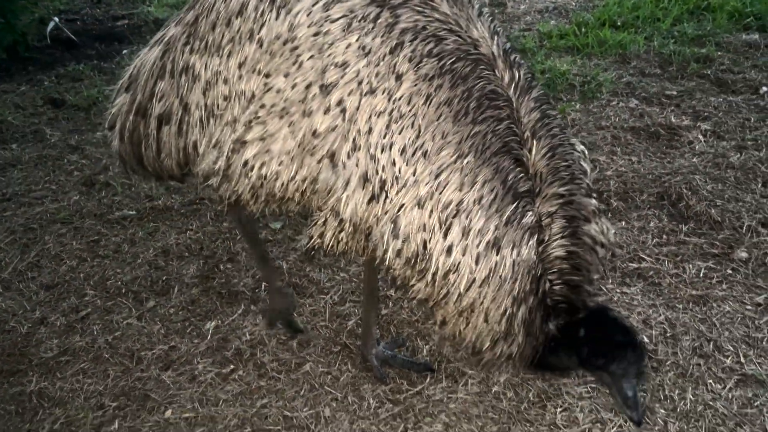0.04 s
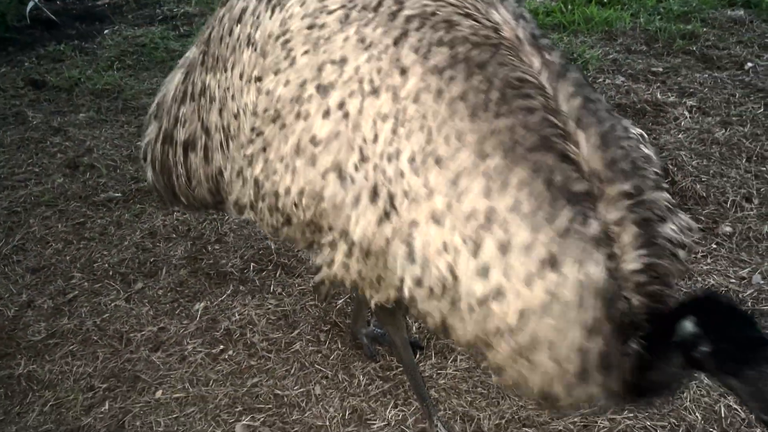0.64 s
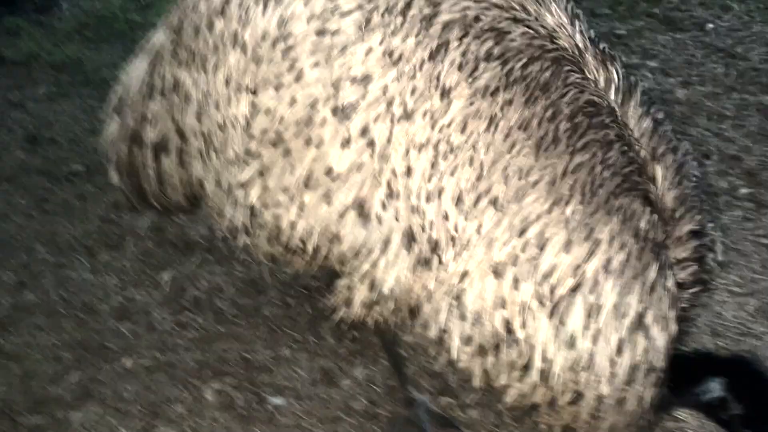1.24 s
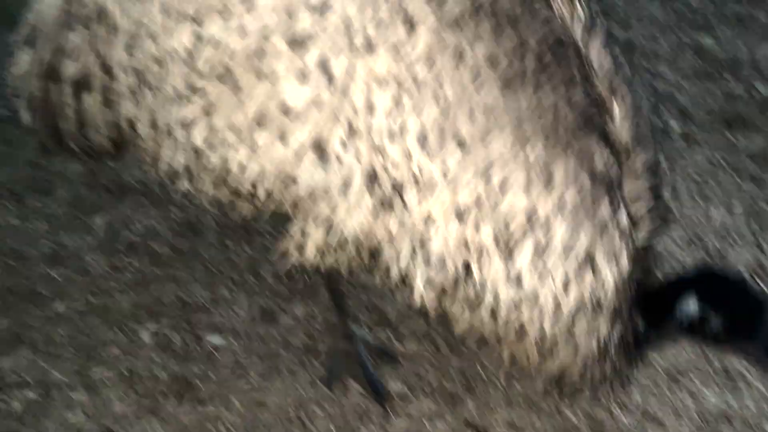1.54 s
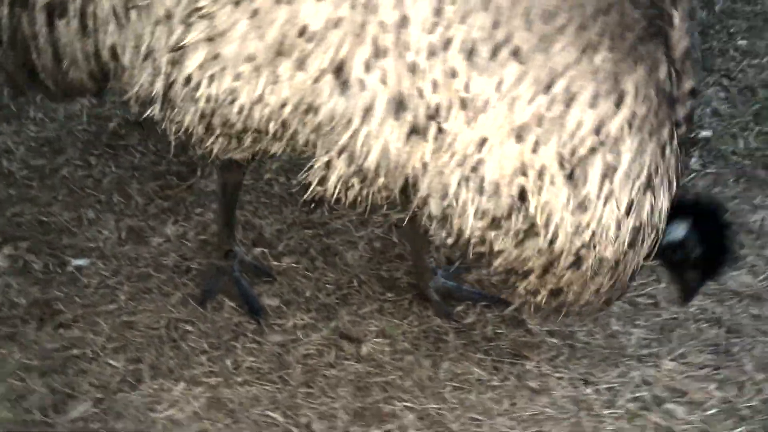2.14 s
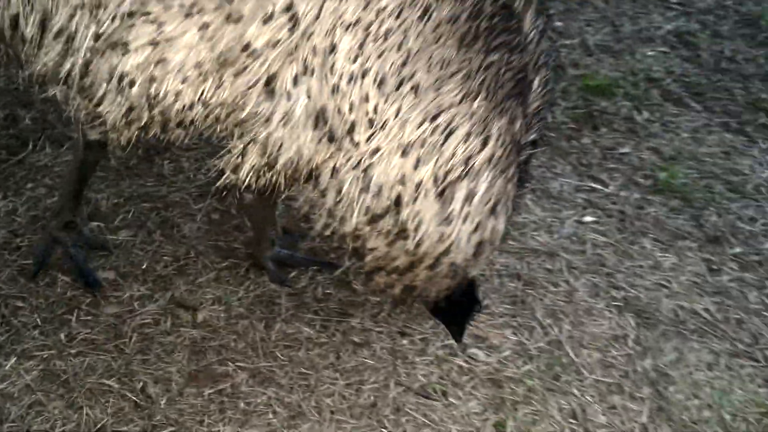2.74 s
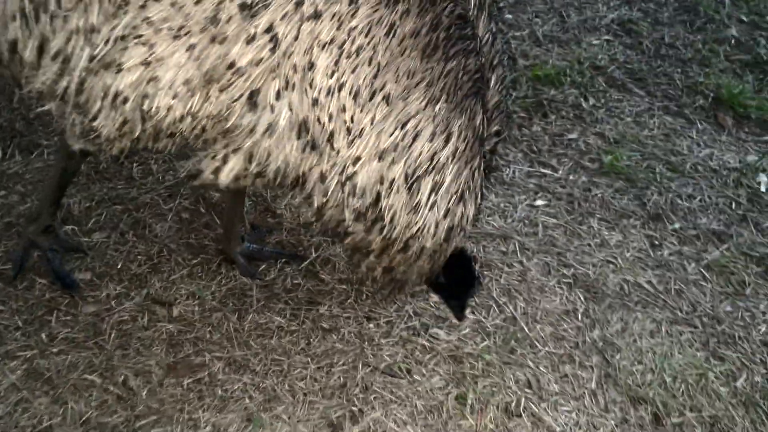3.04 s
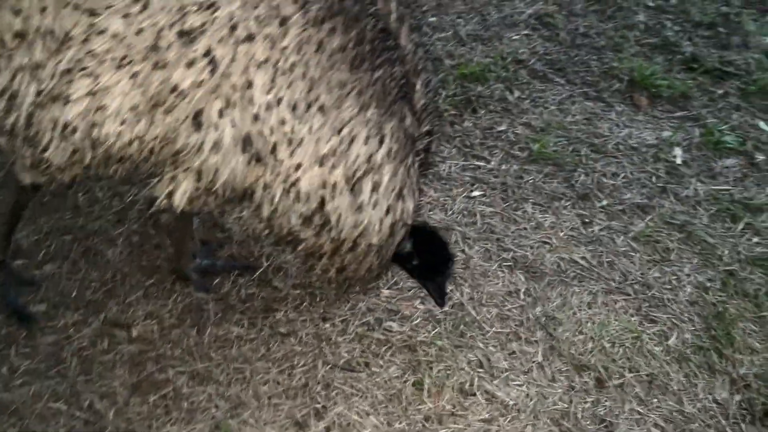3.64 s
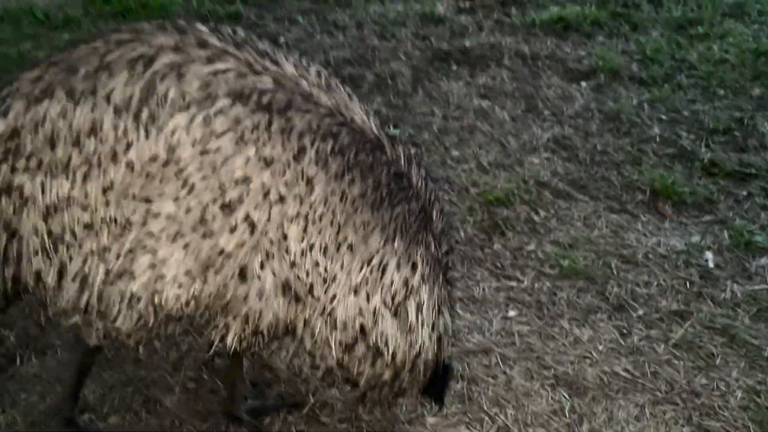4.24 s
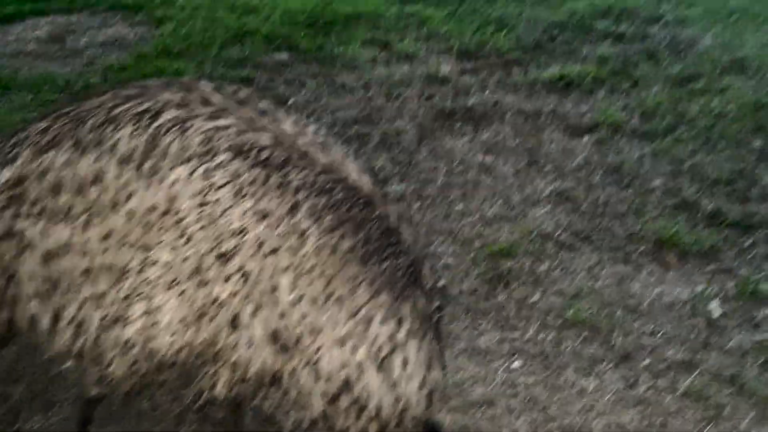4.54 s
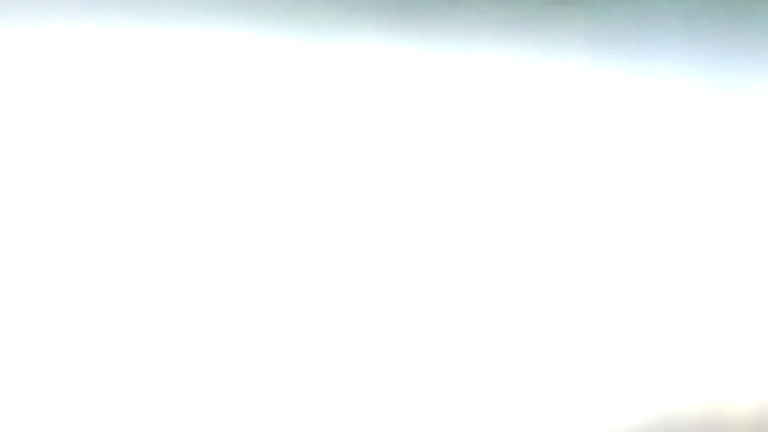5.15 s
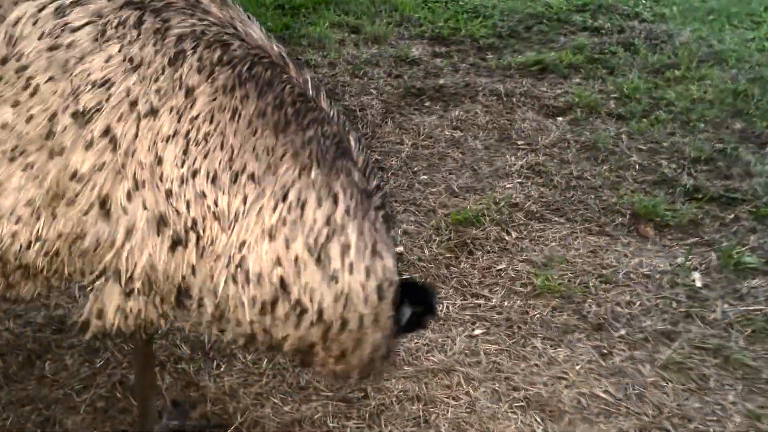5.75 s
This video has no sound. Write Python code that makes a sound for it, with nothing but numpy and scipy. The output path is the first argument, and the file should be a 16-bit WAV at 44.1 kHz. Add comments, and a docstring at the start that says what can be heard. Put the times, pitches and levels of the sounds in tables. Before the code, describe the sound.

An emu gives three short, deep drumming grunts while stepping through crackling dry grass, with insects trilling behind it.

```python
"""Emu in dry grass

An emu grunts three times up close, each a slow, uneven train of pulses drumming in its throat sac.
Its feet and feathers swish and crackle through the stalks, with scrapes, soft thuds and a sharp knock.
Behind it a cricket trills over a steady insect chorus and a small bird whistles falling runs.
Far birds chirp, a faint drone swells and the open air rumbles."""
import sys
import numpy as np
from scipy import signal
from scipy.fft import rfft, irfft
from scipy.io import wavfile
from scipy.ndimage import uniform_filter1d

SR = 44100
rng = np.random.default_rng(int(sys.argv[2]) if len(sys.argv) > 2 else 0)


def generate_wav(sig):
    """Save sig (samples, or channels by samples) to the path in sys.argv[1] as 16-bit PCM at SR."""
    pcm = np.round(np.clip(np.atleast_2d(sig).T, -1, 1) * 32767).astype(np.int16)
    wavfile.write(sys.argv[1], SR, pcm)


N = 256220
TIME = np.arange(N) / SR

# The bright tone of a breaking stalk. Each row: frequency in Hz, level in dB.
STALK_TONE = [(500, -45), (2500, -30), (5000, -21), (7000, -9), (8700, -1), (11400, 3), (12700, 1),
              (13600, -9), (15500, -8)]


def gain_of(db):
    """Decibels to gain."""
    return 10 ** (np.asarray(db) / 20)


def unit_rms(x):
    """Scales to an rms of one."""
    return x / np.sqrt(np.mean(x ** 2) + 1e-20)


def curve_at(points, hz):
    """Reads a curve on a log-frequency axis."""
    point_hz, value = np.transpose(points)
    return np.interp(np.log(hz + 1), np.log(point_hz + 1), value)


def add(mix, start_s, sound):
    """Mixes a sound in at its start time."""
    part = mix[..., max(round(start_s * SR), 0):][..., :sound.shape[-1]]
    part += sound[..., :part.shape[-1]]


def wander(seconds):
    """A smooth random wobble of unit rms that changes over about this time."""
    width = max(int(seconds * SR), 1)
    return unit_rms(uniform_filter1d(uniform_filter1d(rng.standard_normal(N), width), width))


def swell(peak_s, db, rise_s, fall_s):
    """A bell-shaped envelope with its own rise and fall."""
    width_s = np.where(TIME < peak_s, rise_s, fall_s)
    return gain_of(db) * np.exp(-((TIME - peak_s) / width_s) ** 2 / 2)


def ring(x, spectrum):
    """Rings x through a minimum-phase body of unit energy with this spectrum."""
    hz = abs(np.fft.fftfreq(8192, 1 / SR))
    log_gain = np.log(gain_of(curve_at(spectrum, hz)))
    response = np.fft.ifft(np.exp(np.conj(signal.hilbert(log_gain)))).real[:4096]
    return signal.oaconvolve(x, response / np.linalg.norm(response))[:len(x)]


def spread(pair, spectrum, lead_s=0.):
    """Colours two unrelated signals and blends them to stereo, the left side lead_s early."""
    # Stereo image. Each row: frequency in Hz, left-right likeness from 0 to 1.
    likeness = [(60, 0.93), (250, 0.95), (600, 0.54), (1200, 0.073), (3000, 0.55), (5400, 0.35), (8800, 1),
                (12000, 0.069)]
    hz = np.fft.rfftfreq(2 ** 18, 1 / SR)
    first, second = rfft(pair, 2 ** 18)
    alike = curve_at(likeness, hz)
    mid, side = first * np.sqrt(1 + alike), second * np.sqrt(1 - alike)
    stereo = np.array([(mid + side) * np.exp(2j * np.pi * hz * lead_s), mid - side])
    return unit_rms(irfft(stereo * gain_of(curve_at(spectrum, hz)))[:, :N])


def hiss(spectrum, lead_s=0.):
    """Coloured stereo noise of unit rms."""
    return spread(rng.standard_normal((2, N)), spectrum, lead_s)


def crackles(per_s, spread_db):
    """Two trains of tiny clicks, a few much larger than the rest."""
    sizes = gain_of(spread_db * np.minimum(rng.exponential(1, (2, N)), 4))
    return sizes * rng.standard_normal((2, N)) * (rng.random((2, N)) < per_s / SR)


def with_echoes(x, wet_db, t60):
    """The direct sound plus scattered stereo echoes from trees and fences."""
    t = np.arange(SR) / SR
    taps = rng.standard_normal((2, SR)) * (rng.random((2, SR)) < .05)
    taps *= gain_of(-60 * t / t60) * (t > .006)
    taps /= np.linalg.norm(taps, axis=1, keepdims=True)
    return x + gain_of(wet_db) * signal.oaconvolve(x[None], taps, axes=1)[:, :N]


def air():
    """A low outdoor rumble under a soft, distant wash."""
    # The two layers of the bed. Each row: frequency in Hz, level in dB.
    rumble_tone = [(15, -34), (30, -26), (48, 1), (70, 1.5), (100, 2), (140, -4.5), (200, -14), (300, -20),
                   (450, -35.5), (900, -73)]
    wash_tone = [(100, -10.5), (300, -2), (650, 1.5), (900, -3), (1300, -12), (2000, -21), (3000, -31),
                 (4500, -24), (6800, -19), (9500, -59), (11300, -21), (12300, -30), (13500, -63)]
    rumble = hiss(rumble_tone) * gain_of(-36 + .24 * wander(.076))
    return rumble * gain_of([[-.35], [.35]]) + hiss(wash_tone) * gain_of(-52)


def drone():
    """A low, distant band of noise comes and goes."""
    # Its colour. Each row: frequency in Hz, level in dB.
    tone = [(120, -17), (210, -2), (270, 3.5), (320, -1), (385, 1), (460, -6), (900, -86)]
    # Its swell. Each row: time in seconds, level in dB.
    fader = [(0, -70), (2.2, -57.5), (3.5, -58), (4.3, -51.5), (4.78, -51), (4.95, -43.5), (5.15, -50),
             (5.81, -59)]
    return hiss(tone) * gain_of(np.interp(TIME, *np.transpose(fader)))


def insect_chorus():
    """Countless distant crickets and katydids merge into two shrill, faintly throbbing bands."""
    # The two bands. Each row: frequency in Hz, level in dB.
    cricket_band = [(4300, -48), (4750, -18), (5100, 0), (5400, 9), (5700, 2.5), (6000, -20), (6600, -29)]
    katydid_band = [(7000, -40), (7900, -12), (8450, 1.5), (8850, 7), (9300, 3), (9600, -4), (9900, -59),
                    (10200, -43)]
    crickets = hiss(cricket_band) * gain_of(-57.5 + .47 * wander(.067) + 1.7 * wander(.044))
    katydids = hiss(katydid_band, lead_s=2.7e-5)
    katydids *= gain_of(-52.5 + 1.7 * wander(.36) + .29 * wander(.0024))
    return crickets + katydids


def whistles(notes):
    """Each bird note is a wavering sine; its hook bends the pitch upward, then levels off."""
    out, unsteady = np.zeros(N), wander(.00079)
    for start, length, hz, hook, waver, db in notes:
        along = np.linspace(0, 1, int(length * SR))
        bend = hook * (np.sin(np.pi * along / 2) - 2 / np.pi)
        jitter = waver * np.roll(unsteady, -int(start * SR))[:len(along)]
        phase = 2 * np.pi * np.cumsum(hz * (1 + bend + jitter)) / SR
        add(out, start, gain_of(db) * np.sqrt(2) * np.sin(np.pi * along) * np.sin(phase))
    return out


def far_birds(chirp_every_s=.085, chirp_s=.021, hook=.193, waver=.023, flicker_db=3):
    """Evenly spaced chirps and level whistles fade in and out among the trees."""
    # Chirp series. Each row: start in seconds, series length in seconds, pitch in Hz, level in dB.
    series = [(0.302, .21, 2810, -63.5), (1.53, .04, 7300, -63), (3.075, .38, 7400, -62)]
    # Held whistles. Each row: start in seconds, length in seconds, pitch in Hz, level in dB.
    held = [(4.971, 0.082, 2660, -62), (5.04, 0.05, 7200, -62), (5.21, 0.31, 2214, -67)]
    notes = [(start + offset, chirp_s, hz, hook, waver, db)
             for start, length, hz, db in series for offset in np.arange(0, length, chirp_every_s)]
    notes += [(start, length, hz, 0, waver, db) for start, length, hz, db in held]
    calls = whistles(notes) * gain_of(flicker_db * wander(.02))
    return with_echoes(calls, wet_db=1, t60=.4)


def small_bird(notes_per_run=9, accent_db=7.5, accent_at=.93, accent_width=.13):
    """Runs of whistled notes step down in pitch, slowing and growing louder near the end."""
    # Each row: start in seconds, length in seconds, first and last pitch in Hz,
    # bend of the fall (over 1 is steep at first), slowing as a share, level in dB.
    runs = [(1.837, .187, 4170, 2864, 1.6, .2, -43), (3.396, 0.17, 3930, 2700, 0.72, .08, -46),
            (5.722, 0.16, 4090, 2750, 0.88, 0.11, -47)]
    notes = []
    for start, length, first_hz, last_hz, bend, slowing, level_db in runs:
        for along in np.linspace(0, 1, notes_per_run):
            # Short, raspy hooks turn into longer, clean pips.
            note_s = np.interp(along ** 2, [0, 1], [.015, .019])
            hook = np.interp(along ** 2, [0, 1], [.14, .11])
            waver = np.interp(along ** 2, [0, 1], [.047, .0084])
            middle_s = start + length * ((1 - slowing) * along + slowing * along ** 5)
            hz = last_hz + (first_hz - last_hz) * (1 - along) ** bend
            db = level_db + accent_db * np.exp(-((along - accent_at) / accent_width) ** 2)
            notes.append((middle_s - note_s / 2, note_s, hz, hook, waver, db))
    song = with_echoes(whistles(notes), wet_db=-12, t60=.9)
    mono = song.mean(0)
    bushes = with_echoes(mono, wet_db=-5.5, t60=.09) - mono  # blurs each note into the next
    return song + bushes


def cricket(strokes_per_s=84, top_hz=5870, fall_hz=350, duty=.74, octave_db=-11):
    """Each wing stroke of the near cricket is a short falling tone with a weaker octave."""
    # Each row: start in seconds, end in seconds, level in dB.
    trills = [(-.02, .28, -54.5), (0.415, 0.888, -55), (1.026, 1.275, -54), (1.238, 1.583, -51),
              (1.736, 2.197, -55.5), (2.21, 2.61, -52.5), (2.69, 3.063, -58.5), (3.182, 3.521, -52.5),
              (3.635, 4.47, -51.5), (4.578, 5.114, -51), (5.298, 5.846, -52)]
    edge_s, sag_db = .014, .5
    level = np.zeros(N)
    for start, end, db in trills:
        gate = np.clip(np.minimum(TIME - start, end - TIME) / edge_s, 0, 1)
        trill_db = db - sag_db * np.interp(TIME, [start, end], [-.5, .5])
        level = np.maximum(level, gate * gain_of(trill_db))
    cycles = np.cumsum(strokes_per_s * (1 + .1 * wander(.0092))) / SR
    along = np.minimum(cycles % 1 / duty, 1)
    stroke = unit_rms(np.sin(np.pi * along) * gain_of(3.3 * wander(.0029)))
    pitch_hz = top_hz - fall_hz * along + 22 * wander(.00245) + 20 * wander(.0507)
    phase = 2 * np.pi * np.cumsum(pitch_hz) / SR
    tone = np.sqrt(2) * (np.sin(phase) + gain_of(octave_db) * np.sin(2 * phase))
    return with_echoes(level * stroke * tone, wet_db=-5, t60=.08) * gain_of([[.6], [-.6]])


def grass(fall_over_rise=1.55, splinter_db=-4):
    """Dry stalks swish: a dull scrape, a fizz of tiny crackles, and splintering under most pressure."""
    # The emu shifts its weight. Each row: peak time in seconds, level in dB, rise and fall in seconds.
    shuffles = [(.55, -59, 0.1, 0.19), (2.02, -50.5, 0.092, 0.22), (3.2, -61, 0.74, .18)]
    # Feet and feathers brush past.
    # Each row: peak time in seconds, level in dB, rise in seconds, crispness from 0 to 1.
    swishes = [(.10, -52, 0.025, 1), (0.43, -42.5, 0.013, 1), (1.34, -51.5, 0.044, 0.1),
               (1.818, -38.5, 0.023, 0.91), (2.53, -46, 0.041, 1), (2.66, -55, 0.063, 0),
               (3.72, -46.5, 0.061, 0.82), (3.828, -37, 0.056, 0.85), (3.972, -37.5, 0.033, 0.71),
               (4.06, -49, 0.042, 0.67), (4.636, -45.5, 0.028, .2)]
    # The colours of a swish. Each row: frequency in Hz, level in dB.
    dull_tone = [(200, -25), (500, -0.5), (800, 2), (1300, 4), (1650, -1), (2100, 0.5), (3200, -6),
                 (5000, -12), (8000, -4.5), (12000, -19), (14000, -54)]
    crisp_tone = [(300, -40), (1000, -42), (2200, -6.5), (4000, -7), (6500, -5.5), (8700, 0), (10200, -3.5),
                  (11400, 4.5), (12600, -18), (13500, -32), (15500, -37)]
    dull_power = np.zeros(N)
    crisp_power = sum(swell(*row) ** 2 for row in shuffles)
    for peak_s, db, rise_s, crispness in swishes:
        brush = swell(peak_s, db, rise_s, rise_s * fall_over_rise)
        spring_back = swell(peak_s + .067, db - 15.5, rise_s=.06, fall_s=.19)
        power = brush ** 2 + spring_back ** 2
        dull_power += (1 - crispness) * power
        crisp_power += crispness * power
    lead_s = 2e-5
    scrape = np.sqrt(dull_power) * hiss(dull_tone, lead_s)
    fizz = np.sqrt(crisp_power) * spread(crackles(per_s=7000, spread_db=3), crisp_tone, lead_s)
    pressure = crisp_power / np.sqrt(crisp_power.max())
    splinters = pressure * spread(crackles(per_s=260, spread_db=4), STALK_TONE, lead_s)
    rustle = scrape + fizz + gain_of(splinter_db) * splinters
    return rustle * gain_of(1.37 * wander(.014)) * gain_of([[.5], [-.5]])


def scrapes(grit_db=-3, fall_over_rise=1.74):
    """Friction and crunching grit ring one broad resonance for each scrape on the ground."""
    # Each row: peak time in seconds, level in dB, rise in seconds, ring centre and width in Hz.
    strokes = [(1.042, -39.5, 0.0041, 616, 190), (1.33, -52.5, 0.019, 1900, 280),
               (1.813, -34.5, 0.024, 11960, 1800), (2.665, -52, 0.04, 3520, 1200),
               (3.68, -57.5, 0.038, 1820, 550), (4.62, -47, 0.045, 752, 160),
               (4.63, -46.5, 0.026, 1230, 190), (4.63, -50, 0.02, 3400, 1100)]
    flat = [(100, 0), (8000, 0)]
    friction = hiss(flat) + gain_of(grit_db) * spread(crackles(per_s=250, spread_db=3), flat)
    out = np.zeros((2, N))
    for peak_s, db, rise_s, hz, width in strokes:
        band = signal.butter(2, [hz - width / 2, hz + width / 2], "band", fs=SR, output="sos")
        envelope = swell(peak_s, db, rise_s, rise_s * fall_over_rise)
        out += envelope * unit_rms(signal.sosfilt(band, friction))
    return out


def snaps(decay_s=.00091, strays_per_s=5, stray_db=-41.5):
    """Single stalks break with a bright tick: a few loudly, others faintly at random."""
    # Each row: time in seconds, level in dB.
    loud_snaps = [(.779, -25.5), (1.834, -17), (1.9036, -26), (1.9756, -24.5), (2.0231, -20.5),
                  (2.075, -29), (2.5835, -30), (3.9572, -20), (3.9776, -14)]
    breaks = np.flatnonzero(rng.random(N) < strays_per_s / SR)
    size_db = stray_db + rng.standard_normal(N)
    strays = [(i / SR, size_db[i]) for i in breaks]
    noise = rng.standard_normal(N)
    out, t = np.zeros(N), np.arange(400) / SR
    for start, db in list(loud_snaps) + strays:
        burst = np.roll(noise, -int(start * SR))[:len(t)] * np.exp(-t / decay_s)
        add(out, start, gain_of(db) * burst / abs(burst).max())
    return with_echoes(ring(out, STALK_TONE), wet_db=-9, t60=.06)


def knock(attack_s=.00086, trim_db=-5, left_delay_s=.00034):
    """Something hard is struck off to the right, rattles and rings briefly."""
    # The hit and its rattle. Each row: time in seconds, level in dB.
    hits = [(3.7913, -14), (3.7985, -38), (3.824, -36)]
    # Its ring. Each row: frequency in Hz, level in dB, seconds to fall by 60 dB.
    modes = [(770, -6, 0.045), (1090, -11, 0.065), (1326, 3, 0.043), (1354, -3, 0.055), (1456, -5, 0.09),
             (1700, -2, 0.05), (2190, -15.5, .07), (2500, -0.5, 0.015), (2740, -23, 0.028),
             (2880, -5.5, 0.023), (4280, -21, 0.023), (5080, -13.5, 0.037)]
    out, t = np.zeros(N), np.arange(SR // 5) / SR
    attack = np.minimum(t / attack_s, 1)
    for start, hit_db in hits:
        for hz, mode_db, t60 in modes:
            envelope = attack * gain_of(hit_db + mode_db + trim_db - 60 * t / t60)
            add(out, start, envelope * np.sin(2 * np.pi * (hz * t + rng.random())))
    left, right = with_echoes(out, wet_db=-4.5, t60=.11)
    return np.array([np.roll(left, round(left_delay_s * SR)), right]) * gain_of([[-3], [0]])


def footfalls():
    """The emu's weight lands as a few slow swings of pressure."""
    # Each row: start in seconds, length in seconds, pitch in Hz, level in dB.
    thuds = [(3.577, 0.035, 72.5, -23.5), (3.76, 0.064, 63.5, -25.5), (3.799, 0.044, 62, -18),
             (3.967, 0.037, 62, -22), (4.103, 0.049, 78, -27)]
    out = np.zeros(N)
    for start, length, hz, db in thuds:
        t = np.arange(0, length, 1 / SR)
        add(out, start, gain_of(db) * np.sin(np.pi * t / length) * np.sin(2 * np.pi * hz * t))
    return out


def emu_grunts(slack_pulses_per_s=25, attack_s=.053, release_s=.055, puff_cycles=.31):
    """Uneven pulses drum in the throat sac; each lets a rasping puff of air through the windpipe."""
    # Each row: start in seconds, length in seconds, top rate in pulses per second, drum, rasp and
    # open-throat levels in dB, tightness as a factor on the sac's resonances, deep boom in dB.
    grunts = [(0.347, .24, 79, -19.5, -28, -39, 0.96, -1.5), (2.673, .2, 71, -17.5, -35, -60, 0.96, 3),
              (5.588, .275, 77, -21.5, -35.5, -54, 1.08, -1)]
    # The three colours of the throat. Each row: frequency in Hz, level in dB.
    sac_tone = [(20, -50), (42, -1), (58, -4.5), (70, 3.5), (86, -4.5), (105, 3), (132, 1), (153, 5),
                (176, -3), (235, -21.5), (330, -34.5), (520, -67), (1100, -82)]
    rasp_tone = [(100, -20.5), (200, 12), (280, 5.5), (370, 2), (520, -15.5), (800, -31.5), (2000, -39.5)]
    open_tone = [(200, -11), (380, 5.5), (480, 9.5), (540, -6), (640, -8.5), (950, -32), (1120, -15),
                 (1270, -1), (1450, -20), (2500, -29), (6000, -57)]
    drum, rasp, open_throat = np.zeros((3, N))
    for start, length, top_rate, drum_db, rasp_db, open_db, tightness, boom_db in grunts:
        t = np.arange(0, length, 1 / SR)
        effort = np.sin(np.pi * (t / length) ** 1.02)
        rate = slack_pulses_per_s + (top_rate - slack_pulses_per_s) * effort
        fade_in_db = -13 * np.maximum(1 - t / attack_s, 0)
        fade_out_db = -19 * np.maximum(1 - (length - t) / release_s, 0)
        # The slack folds flap early or late, harder or softer, from one pulse to the next.
        timing = np.exp(.24 * wander(.002)[:len(t)])
        force = gain_of(1.7 * wander(.002)[:len(t)])
        cycles = np.cumsum(rate * timing / timing.mean()) / SR
        pulses = np.diff(np.floor(cycles), prepend=-1) * np.sqrt(SR / rate)
        pulses[0] *= gain_of(4.5)  # accent on the opening pulse
        pulses *= force * gain_of(drum_db + fade_in_db + fade_out_db)
        sac = [(hz * tightness, db + boom_db * (hz < 95)) for hz, db in sac_tone]
        add(drum, start, ring(np.pad(pulses, (0, SR // 10)), sac))
        puffs = unit_rms(force * np.exp(-(cycles % 1) / puff_cycles) * rng.standard_normal(N)[:len(t)])
        slack = 1 - effort ** 2  # the breathy layers bloom at the height of the effort
        add(rasp, start, puffs * gain_of(rasp_db - 18.5 * slack))
        add(open_throat, start, puffs * gain_of(open_db - 33 * slack))
    voice = drum + ring(rasp, rasp_tone) + ring(open_throat, open_tone)
    return with_echoes(voice, wet_db=-20, t60=.28) * gain_of([[-.5], [.6]])


def scene():
    """The emu and its steps in front of insects, birds and open air."""
    steps = grass() + scrapes() + snaps() + knock() + footfalls()
    emu = emu_grunts() + steps
    wildlife = cricket() + insect_chorus() + small_bird() + far_birds()
    return emu + wildlife + air() + drone()


def record(dry, cutoff_hz=15600):
    """The microphone's uneven treble, then a steep low-pass."""
    # Each row: frequency in Hz, gain in dB.
    mic_treble = [(9500, 0), (9850, -5.5), (10200, -20), (10600, -1), (11000, 2), (12500, -12.5),
                  (13200, -13), (13900, -38), (15000, -14)]
    hz = np.fft.rfftfreq(2 * N, 1 / SR)
    heard = irfft(rfft(dry, 2 * N) * gain_of(curve_at(mic_treble, hz)))[:, :N]
    low_pass = signal.firwin(511, cutoff_hz, window=("kaiser", 9), fs=SR)
    return signal.oaconvolve(heard, low_pass[None], "same")


dry = scene()
out = record(dry)
generate_wav(out)
```